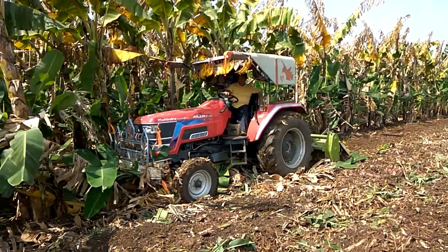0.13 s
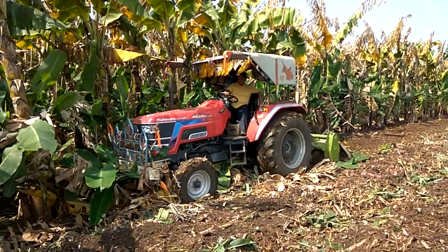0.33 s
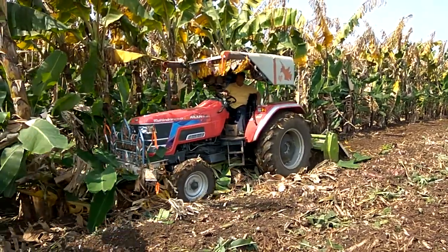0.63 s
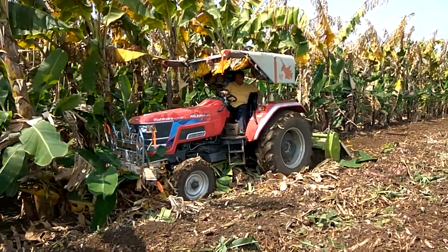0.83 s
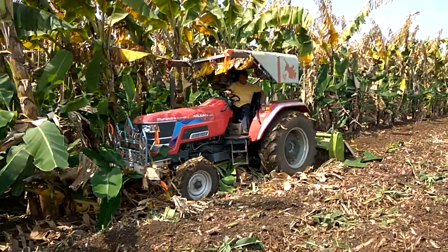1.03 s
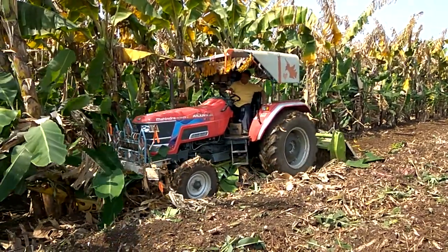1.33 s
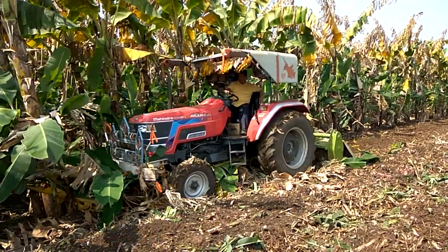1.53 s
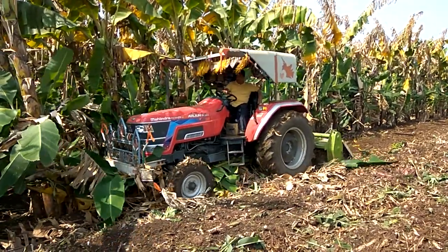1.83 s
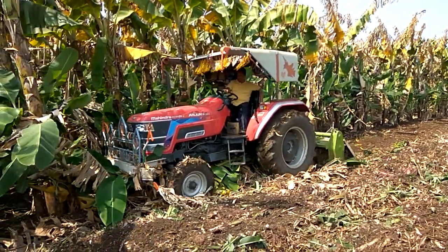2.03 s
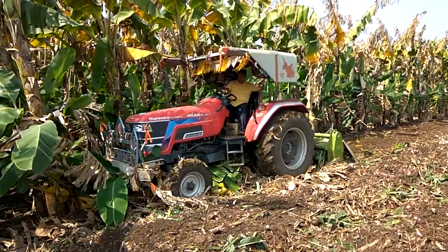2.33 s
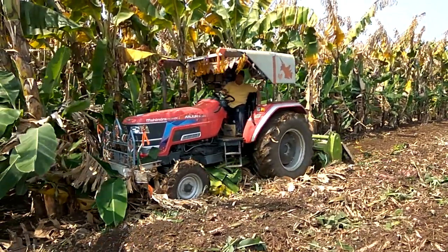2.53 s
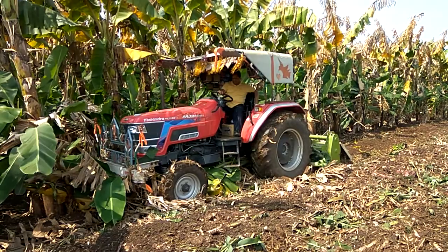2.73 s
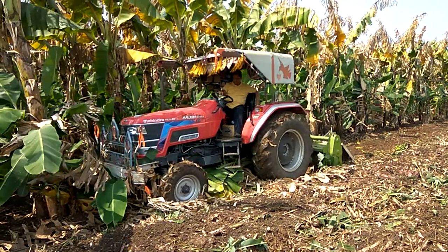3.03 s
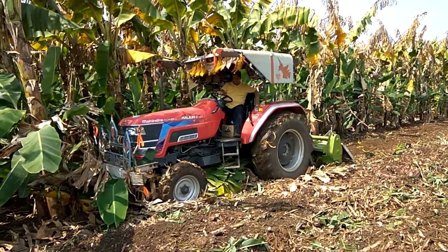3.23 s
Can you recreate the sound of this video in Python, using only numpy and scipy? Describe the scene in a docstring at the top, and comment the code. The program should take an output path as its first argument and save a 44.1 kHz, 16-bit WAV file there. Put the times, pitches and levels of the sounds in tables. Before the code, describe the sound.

A diesel tractor runs with a rough, steady throb some metres away in a field. Its mulcher rattles and crackles through plant stalks, with irregular knocks on a steel hood and one sharp snap, easing slightly near the end.

```python
"""A four-cylinder diesel tractor crawls through a plantation some metres away, a flail mulcher behind it.
Uneven firings thump in the exhaust over a clean boom. Flails beat stalks against a ringing steel hood;
shreds crackle, single lumps knock, stems thud and a dry stalk snaps.
The two ports of a stereo microphone hear it slightly apart."""
import sys
import numpy as np
from scipy import signal
from scipy.fft import rfft, irfft
from scipy.io import wavfile
from scipy.ndimage import uniform_filter1d, map_coordinates

SR = 44100
rng = np.random.default_rng(int(sys.argv[2]) if len(sys.argv) > 2 else 0)


def wrap_up_sound(samples):
    """Save the sound to the file named by the first command line argument, as 16-bit audio."""
    columns = np.atleast_2d(samples).T
    # keep every value between -1 and 1, then stretch to whole-number steps
    tamed = np.clip(columns, -1, 1)
    steps = np.round(tamed * 32767).astype(np.int16)
    wavfile.write(sys.argv[1], SR, steps)


N = 149499

# Modes of the steel hood: pitch_hz, level_db, t60_s
HOOD_MODES = [(434.3, -2.5, 0.11), (526, -3.5, 0.13), (695, -6.5, 0.053), (728.3, -4.5, 0.099),
              (871.5, -1.5, 0.081), (914, 0, 0.1), (1013, 0.5, 0.02), (1139.5, 2.5, 0.033),
              (1344, -0.5, 0.02)]
# Modes of the flails: pitch_hz, level_db, t60_s
FLAIL_MODES = [(1520, -2, 0.03), (1766, 4, 0.03), (1912, 1, 0.042), (2114, 3, 0.016), (2356, -3, 0.018),
               (2470, -7.5, 0.025), (2523, -4.5, 0.036), (2750, -9, 0.075)]


def undb(db):
    return 10 ** (np.asarray(db) / 20)


def unit(x):
    """Scale to rms 1."""
    return x / np.sqrt(np.mean(x ** 2))


def curve(table, column=1):
    """One column of a timed table, sample by sample."""
    rows = np.array(table, float)
    return np.interp(np.arange(N) / SR, rows[:, 0], rows[:, column])


def over_hz(table):
    """A (freq_hz, value) table at every FFT bin."""
    rows = np.array(table, float)
    return np.interp(np.log(np.arange(N // 2 + 1) * SR / N + 1), np.log(rows[:, 0] + 1), rows[:, 1])


def colour(x, eq):
    """Apply an EQ curve and scale to rms 1."""
    return unit(irfft(rfft(x) * undb(over_hz(eq)), N))


def ring(x, hz, t60):
    """A decaying mode."""
    pole = np.exp(2j * np.pi * hz / SR - np.log(1000) / (t60 * SR))
    return signal.lfilter([1], [1, -pole], x).imag


def band(x, hz, width_hz):
    return signal.lfilter(*signal.iirpeak(hz, hz / width_hz, fs=SR), x)


def steep_band(x, hz, width_hz):
    return band(band(x, hz, width_hz), hz, width_hz)


def wander(rate_hz):
    """Slow random movement, spread near 1."""
    hold = int(SR / rate_hz)
    steps = np.repeat(rng.standard_normal(N // hold + 1), hold)
    return 1.05 * uniform_filter1d(uniform_filter1d(steps, hold), hold)[:N]


def grains(per_s, spread_db, biggest_db=14):
    """Random clicks, a few larger than the rest."""
    chance, polarity, size = rng.random((N, 3)).T
    level_db = np.minimum(-spread_db * np.log(1 - size), biggest_db)
    return (chance < per_s / SR) * np.sign(polarity - .5) * undb(level_db)


def burst(start_s, db, decay_s):
    """Envelopes that jump up at the given times and die away."""
    hits = np.zeros(N)
    hits[(np.array(start_s) * SR).astype(int)] = undb(db)
    return signal.lfilter([1], [1, -np.exp(-1 / (decay_s * SR))], hits)


def struck_steel(blows, modes, shift_db):
    """A steel part rings with little bass; the balance of its modes keeps shifting."""
    ringing = sum((-1) ** k * undb(db + shift_db * wander(14)) * ring(blows, hz, t60) / np.sqrt(t60)
                  for k, (hz, db, t60) in enumerate(modes))
    return signal.sosfilt(signal.butter(3, 380, "high", fs=SR, output="sos"), ringing)


def stem_thuds():
    """Stems drop under the machine with short, low thuds."""
    # Falling stems: start_s, level_db
    thuds = [(0.181, -23), (0.503, -24.5), (1.47, -24.5), (1.552, -23), (2.256, -25), (3.151, -33.5)]
    start_s, level_db = np.array(thuds).T
    return burst(start_s, level_db, decay_s=.022) * unit(steep_band(rng.standard_normal(N), 114, 90))


def stalk_snap():
    """A dry stalk breaks in a few bright cracks that ring one flail mode."""
    # Cracks of the stalk: start_s, level_db, centre_hz
    snaps = [(2.2405, -19, 4200), (2.244, -7.5, 4200), (2.271, -16.5, 3000), (2.283, -16.5, 3000)]
    start_s, level_db, _ = np.array(snaps).T
    noise = rng.standard_normal(N)
    cracks = sum(burst([at], db, decay_s=.005) * band(noise, hz, 1.5 * hz) for at, db, hz in snaps)
    ping = ring(burst(start_s, level_db, decay_s=.00005), FLAIL_MODES[3][0], t60=.044)
    return cracks + undb(-15.5) * ping


def lump_knocks():
    """Single lumps knock the hood, clank on the flails, crack and ring briefly at their own pitch."""
    # Lump strikes: start_s, level_db, crack_offset_db, pitch_hz
    knocks = [(0.16, -21, -17.5, 1180), (0.269, -6.5, -20, 940), (0.371, -4.5, -18, 874),
              (0.396, -9, 3, 934), (0.412, -10.5, -6.5, 902), (0.432, -12, -9, 1030),
              (0.523, -7.5, -2, 940), (0.701, -7, -7.5, 837), (0.749, -10.5, -38, 856),
              (0.764, -5.5, -7, 963), (0.831, -10.5, -16, 1093), (1.012, -7, -9.5, 864),
              (1.044, -26, -14, 1130), (1.06, -9.5, -12, 1010), (1.187, -11, -15, 814),
              (1.234, -15, -15, 890), (1.299, -3.5, -21, 705), (1.431, -21.5, -20, 900),
              (1.472, 0, -18.5, 1130), (1.5, -8.5, -16, 844), (1.53, -5, -14.5, 1118), (1.612, -4, -5, 914),
              (1.63, -8, -17, 930), (1.668, -18.5, -6.5, 946), (1.689, -13, -17, 934),
              (1.775, -10, -7.5, 1177), (1.811, -3.5, -18, 1140), (1.908, -6, -8, 1105),
              (1.94, -5, -10, 933), (1.944, -6, -12, 1460), (1.97, -19, -22, 920), (1.999, -8, -2, 1816),
              (2.17, -2, -19, 935), (2.239, -10, -8.5, 924), (2.372, -7.5, -16.5, 910),
              (2.574, -10.5, -13, 1250), (2.716, -8.5, -19.5, 910), (2.788, -12.5, -34, 760),
              (2.862, -9, -21, 1146), (2.973, -18, -17, 1060), (3.081, -10.5, -20.5, 874),
              (3.154, -7.5, -5.5, 982), (3.161, -9.5, -7.5, 985), (3.174, -17, -8, 1024),
              (3.229, -12.5, -26.5, 1097)]
    start_s, level_db, crack_offset_db, pitch_hz = np.array(knocks).T
    strike_db, tone_db = level_db - 15.5, level_db - 6.5
    crack_db = strike_db + crack_offset_db
    hood = struck_steel(burst(start_s, strike_db, decay_s=.000067), HOOD_MODES, shift_db=3)
    clank = struck_steel(burst(start_s, crack_db, decay_s=.00005), FLAIL_MODES, shift_db=-6.5)
    cracks = burst(start_s, crack_db, decay_s=.008) * band(rng.standard_normal(N), 2600, 3400)
    attack_s, t60_s = .00039, .059
    tones = np.zeros(N)
    for at, db, hz in zip(start_s, tone_db, pitch_hz):
        age_s = (np.arange(N) / SR - at).clip(0)
        envelope = undb(db - 60 * age_s / t60_s) * (1 - np.exp(-age_s / attack_s))
        tones += envelope * np.sin(2 * np.pi * hz * age_s)
    return undb(-30.5) * hood + undb(-22.5) * clank + cracks + tones


def shred_crackle():
    """Shreds crack with a brief ring over a smooth hiss; they vary in size, so their pitches wander."""
    # Tone of the shredding: freq_hz, gain_db
    shred_eq = [(1650, -26), (2800, -8), (3280, -15.5), (3890, -9), (4230, -11), (4900, -10), (6100, -19),
                (7240, -32.5), (7900, -53), (9000, -16.5), (9600, -24.5), (15900, -120)]
    pitches_hz = np.geomspace(2600, 7200, num=16) * (1 + .02 * rng.standard_normal(16))
    cracks = sum(ring(grains(per_s=120, spread_db=3.5), hz, t60=.02) * np.sqrt(hz) for hz in pitches_hz)
    bent_time = np.cumsum(1 + .06 * wander(9))
    cracks = map_coordinates(cracks, [bent_time], order=3, mode="mirror")
    hiss = band(rng.standard_normal(N), 6800, 7500)
    return colour(unit(cracks) + undb(-.5) * unit(hiss), shred_eq)


def mulcher():
    """Stalks beat the hood and flails, shreds crackle, the rotor rumbles; all follow the feed."""
    # Surges of the feed: time_s, hood_db, crackle_db, flail_db
    feed = [(0.0, -19.5, -42, -30), (0.02, -27.5, -34, -23), (0.04, -31, -31.5, -36),
            (0.07, -35, -37.5, -30.5), (0.1, -22.5, -32, -27.5), (0.13, -28.5, -41, -32),
            (0.19, -20, -30.5, -22.5), (0.24, -26.5, -36.5, -31.5), (0.55, -20.5, -26.5, -23),
            (0.7, -26.5, -35, -30.5), (0.74, -29, -37.5, -28), (0.76, -27, -30.5, -25.5),
            (0.79, -23.5, -33.5, -30.5), (0.85, -25.5, -36, -30), (1.006, -29.5, -35.5, -32),
            (1.013, -21, -31, -27), (1.13, -20, -30, -21.5), (1.17, -24.5, -33.5, -28),
            (1.26, -18, -27, -24), (1.42, -28, -33.5, -30.5), (1.43, -23.5, -24.5, -25),
            (1.48, -18.5, -29, -26), (1.55, -20, -24.5, -23), (1.6, -21, -24.5, -28.5),
            (1.65, -17.5, -28, -22), (1.69, -22.5, -25.5, -21), (1.72, -24.5, -28, -23),
            (1.76, -18.5, -30, -23.5), (1.83, -19, -28.5, -24.5), (1.89, -27.5, -34, -29.5),
            (1.92, -23.5, -33, -33), (1.97, -23, -33.5, -25.5), (2.05, -25.5, -31.5, -29.5),
            (2.13, -24.5, -33, -27), (2.165, -26.5, -36, -33.5), (2.172, -17.5, -32.5, -28),
            (2.236, -28, -32, -28.5), (2.243, -18.5, -20.5, -21.5), (2.26, -22.5, -26, -25),
            (2.3, -23, -30.5, -27), (2.44, -26.5, -35.5, -34), (2.55, -31, -39, -34),
            (2.6, -27.5, -36, -31), (2.72, -30.5, -37, -36.5), (2.82, -31.5, -38, -34.5),
            (2.95, -28, -40, -34), (3.07, -34, -38, -37.5), (3.09, -27, -37, -39),
            (3.151, -30.5, -39.5, -31), (3.156, -18, -39, -23.5), (3.19, -27, -36.5, -27),
            (3.37, -27.5, -39.5, -34.5), (3.39, -20, -36, -42.5)]
    # Tone of the rotor: freq_hz, gain_db
    rumble_eq = [(20, -20.5), (35, -19.5), (80, -13.5), (150, -16.5), (220, -5), (380, -9), (450, -8.5),
                 (600, -17), (890, -5), (1300, -21), (1700, -77)]
    blows = grains(per_s=650, spread_db=8)
    crackle = shred_crackle()
    rumble = colour(rng.standard_normal(N), rumble_eq)
    hood = unit(struck_steel(blows, HOOD_MODES, shift_db=3.5))
    flails = unit(struck_steel(blows, FLAIL_MODES, shift_db=3))
    flicker_db = 2.6 * wander(39.66)
    return (undb(curve(feed, column=1)) * (hood + undb(-3) * rumble)
            + undb(curve(feed, column=2) + flicker_db) * crackle
            + undb(curve(feed, column=3)) * flails)


def exhaust(firings):
    """Four unequal cylinders thump the pipe, one pulse for each whole step of the firing count."""
    # Cylinder strengths in firing order: level_db
    cylinder_db = [4, 3, -4.5, -6]
    # Uneven manifold paths in firing order: delay_ticks (a tick is 1/60 s, about one firing)
    manifold_ticks = [0.0094, 0.01, 0.022, -0.012]
    # Pipe resonances: pitch_hz, nominal_width_hz, level_db
    pipe_modes = [(200.8, 23, -8), (212.3, 48, -14), (234.1, 44, -2), (258.2, 159, -0.5), (303, 63, -13),
                  (425, 109, -11), (517, 72, -31)]
    # Swell of the thump: time_s, level_db
    thump_level = [(0, -24.5), (.2, -24), (.35, -28.5), (.57, -19.5), (.75, -25), (.99, -26), (1.02, -19.5),
                   (1.3, -25.5), (1.4, -28.5), (1.48, -23.5), (1.6, -24.5), (1.8, -24), (2.05, -22),
                   (2.2, -24.5), (2.6, -23.5), (2.85, -26.5), (3.1, -24), (3.39, -29.5)]
    count = (firings + .14).astype(int)  # offsets the pulses against the boom
    onsets = np.flatnonzero(np.diff(count)) + 1
    cylinder = count[onsets] % 4
    scatter_db, jitter = rng.standard_normal((len(onsets), 2)).T
    delay_ticks = np.array(manifold_ticks)[cylinder] + .003 * jitter
    arrivals = np.clip(onsets + (delay_ticks * SR / 60).astype(int), 0, N - 1)
    pulses = np.zeros(N)
    pulses[arrivals] = undb(np.array(cylinder_db)[cylinder] + scatter_db)
    pipe = sum(undb(db) * steep_band(pulses, hz, 1.1 * width) / np.sqrt(width)
               for hz, width, db in pipe_modes)
    return undb(curve(thump_level)) * unit(pipe)


def diesel_engine():
    """The firings drive the exhaust thump, a clean boom below it and diesel knock in the block above."""
    # Engine speed: time_s, firing_rate_hz
    speed = [(0.0, 60.82), (0.199, 62.71), (0.399, 64.23), (0.598, 62.14), (0.798, 60.38), (0.997, 61.68),
             (1.196, 64.16), (1.396, 67.12), (1.595, 65.59), (1.795, 63.77), (1.994, 61.68), (2.194, 60.55),
             (2.393, 59.32), (2.592, 56.94), (2.792, 54.4), (2.991, 54.45), (3.191, 54.48), (3.39, 52.29)]
    # Partials of the boom: firing_rate_multiple, level_db, polarity
    partials = [(1, 0.5, 1), (2, 5.5, -0.62), (3, -5, 0.67)]
    # Swell of the boom: time_s, level_db
    boom_level = [(0.0, -41), (0.57, -35.5), (0.84, -39.5), (1.33, -34.5), (1.41, -38), (1.49, -29),
                  (2.13, -39.5), (2.27, -32), (2.46, -40), (3.13, -43), (3.17, -36), (3.39, -45)]
    firings = 1.04 + np.cumsum(curve(speed)) / SR
    thump = exhaust(firings)
    boom = sum(sign * undb(db) * np.sqrt(2) * np.cos(2 * np.pi * k * firings) for k, db, sign in partials)
    clatter = np.exp(-(firings % 1)) * steep_band(rng.standard_normal(N), 2500, 3000)
    return thump + undb(curve(boom_level)) * boom + undb(-43) * unit(clatter)


def scene():
    """The machine creeps to the left; leaves scatter part of the mulcher, spreading it in stereo."""
    # Likeness of the mulcher at the two ports: freq_hz, likeness (0-1)
    port_likeness = [(100, .98), (500, .94), (1200, .8), (2500, .55), (6000, .5)]
    # Lateness of the left port: freq_hz, delay_s
    port_lag = [(500, .00014), (1300, 0.00018), (1750, 0.00024), (2150, 0.000077), (2850, 0.000066),
                (3500, 0.00011), (6000, 0.00005)]
    # Balance of the ports: freq_hz, left_minus_right_db
    port_balance = [(60, 2), (100, -0.5), (170, 1.2), (290, -2), (490, 6), (830, -0.5), (1400, 0),
                    (2370, -0.5), (4010, 2), (6790, -7)]
    side = np.array([[.5], [-.5]])  # left, right
    hz = np.arange(N // 2 + 1) * SR / N
    left_delay = np.exp(-2j * np.pi * (side + .5) * hz * over_hz(port_lag))
    ports = left_delay * undb(side * over_hz(port_balance))
    notch_hz, notch_width_hz, notch_depth = 571, 43.6, .42  # the echo off the soil thins this band
    ground = 1 - notch_depth / (1 + ((hz - notch_hz) / notch_width_hz) ** 2)
    pan_db_per_s = .5
    pan = undb(side * pan_db_per_s * (np.arange(N) - N / 2) / SR)
    likeness = over_hz(port_likeness)
    centre = np.sqrt((1 + likeness) / 2) * rfft(mulcher())
    centre += rfft(diesel_engine() + lump_knocks() + stem_thuds() + stalk_snap())
    scattered = 2 * side * np.sqrt((1 - likeness) / 2) * rfft(mulcher())
    return pan * irfft(ports * ground * (centre + scattered), N)


def record(dry):
    """The sound is dulled, its loudest peaks are rounded, and the treble falls steeply above 7 kHz."""
    dull_hz, shelf_hz, top_hz = 5910, 7070, 9700
    ceiling, shelf_db = .7, -11.5
    dull = signal.sosfilt(signal.butter(3, dull_hz, fs=SR, output="sos"), dry)
    rounded = ceiling * np.tanh(dull / ceiling)
    body = signal.sosfiltfilt(signal.butter(12, shelf_hz, fs=SR, output="sos"), rounded)
    shelved = body + undb(shelf_db) * (rounded - body)
    return signal.sosfilt(signal.ellip(10, .2, 60, top_hz, fs=SR, output="sos"), shelved)


dry = scene()
out = record(dry)
wrap_up_sound(out)
```